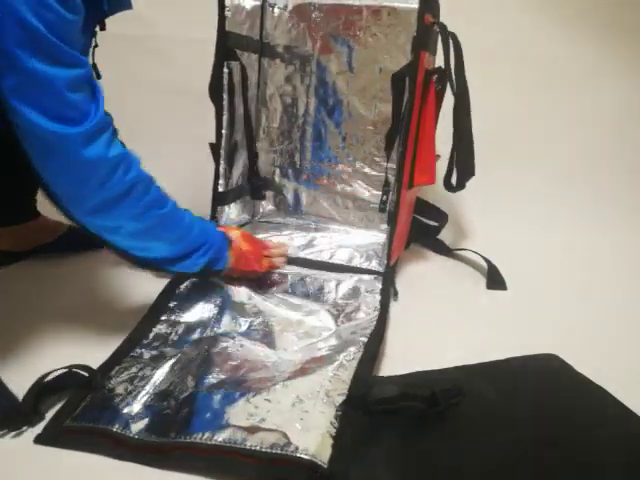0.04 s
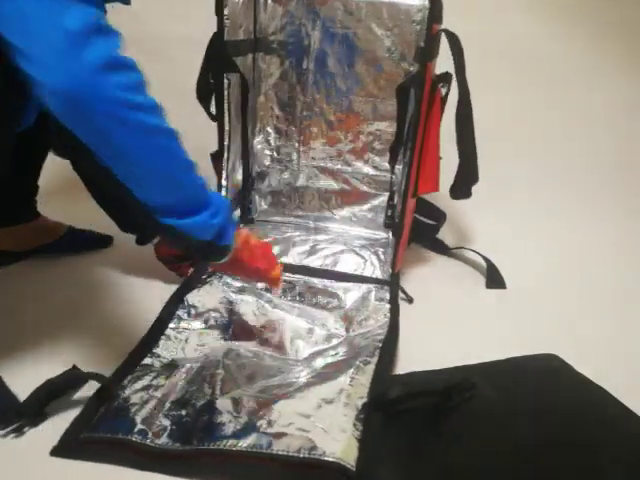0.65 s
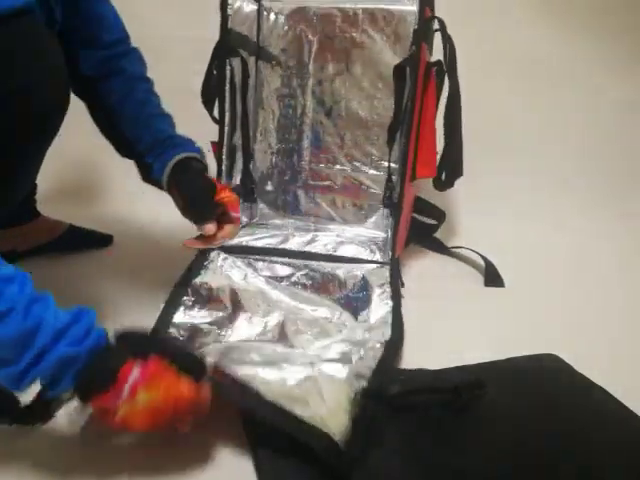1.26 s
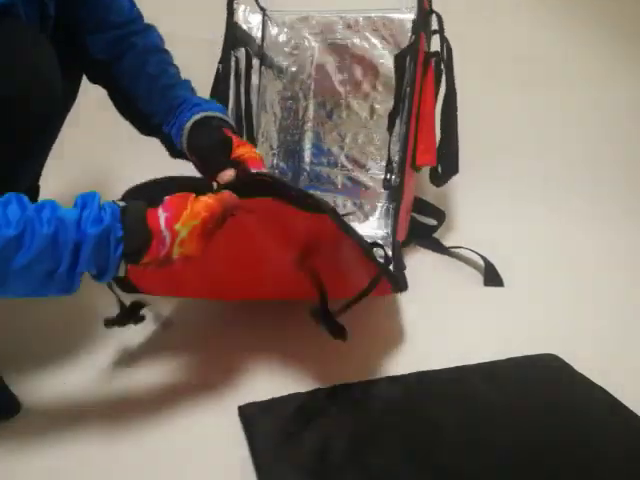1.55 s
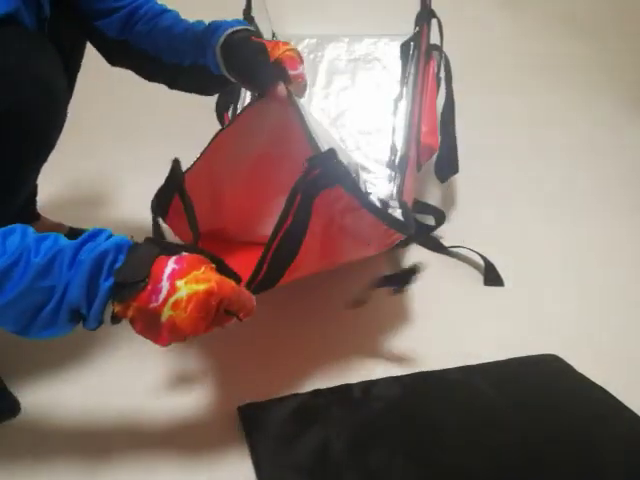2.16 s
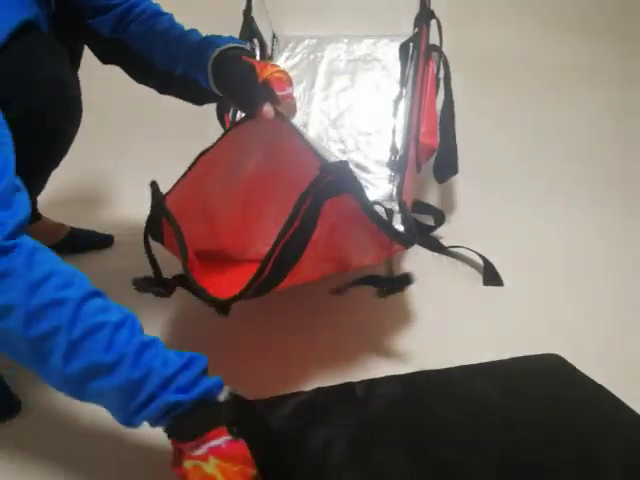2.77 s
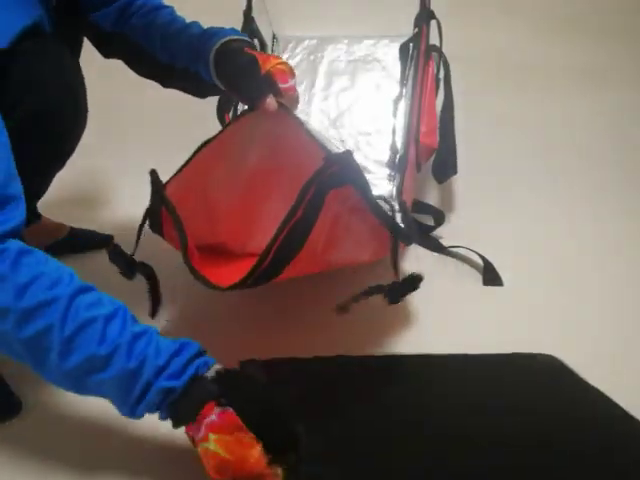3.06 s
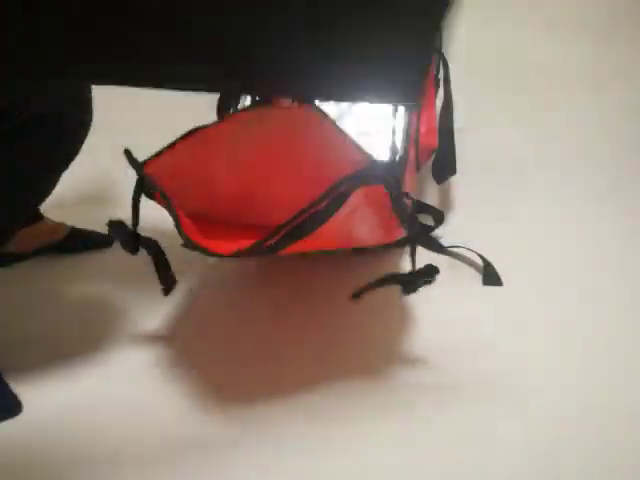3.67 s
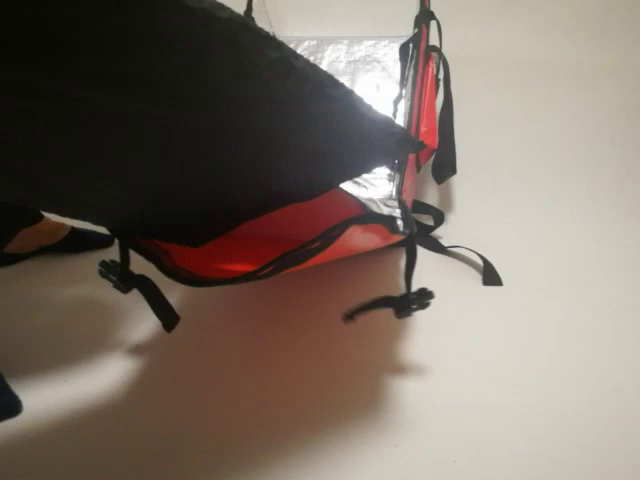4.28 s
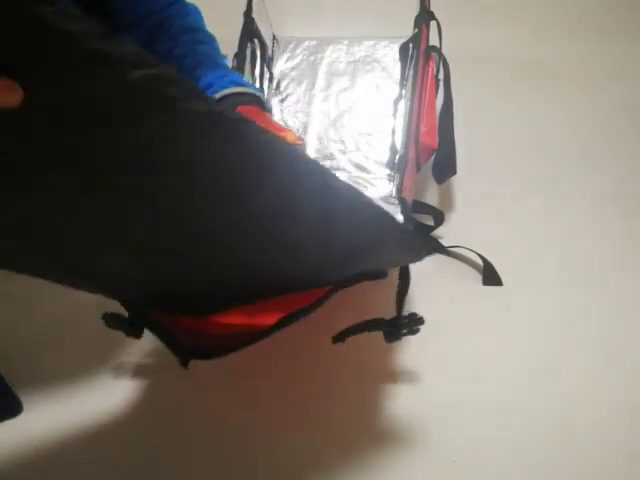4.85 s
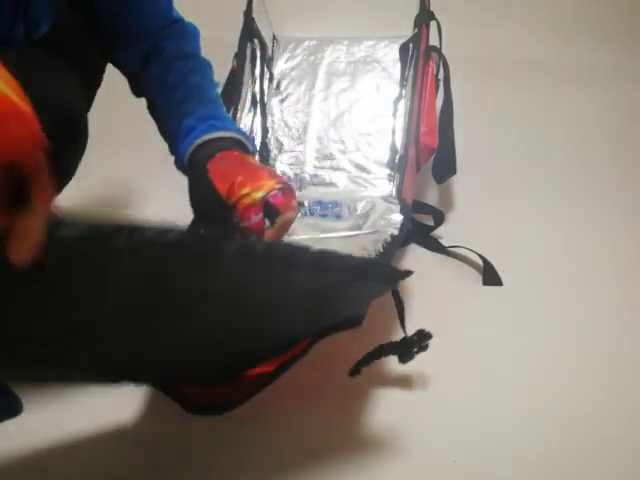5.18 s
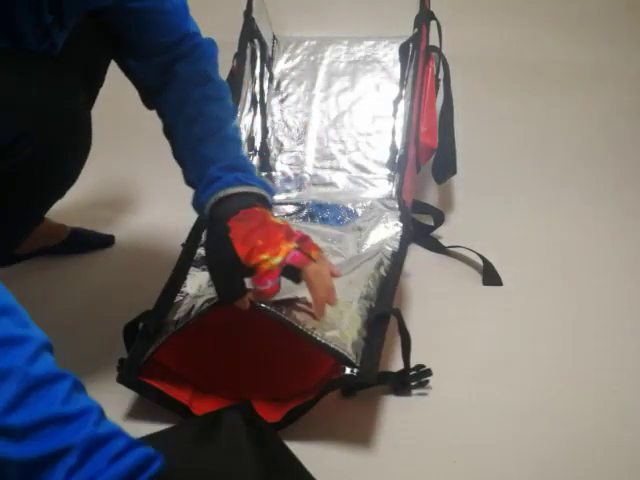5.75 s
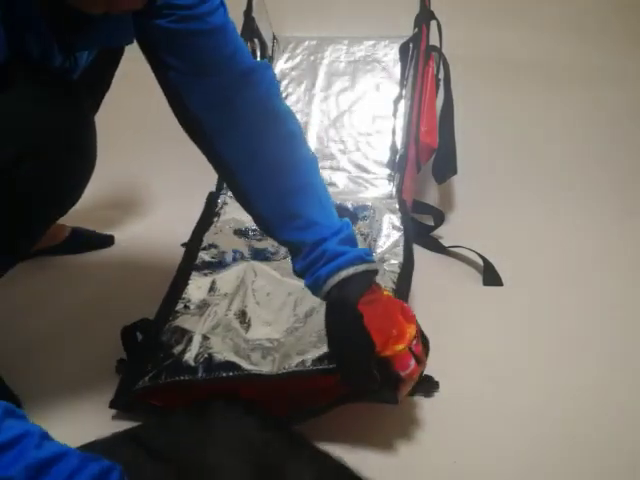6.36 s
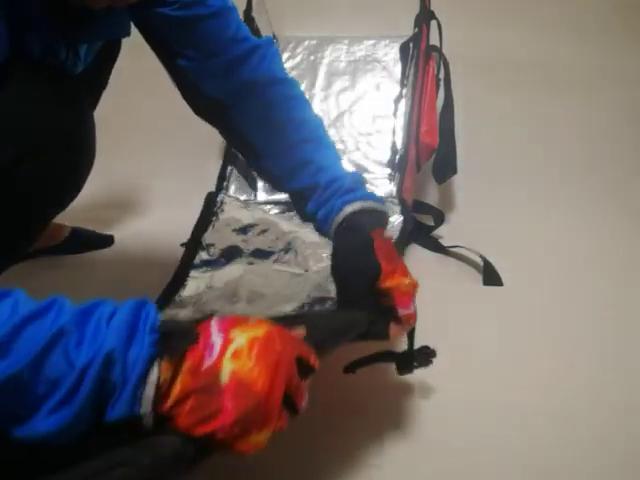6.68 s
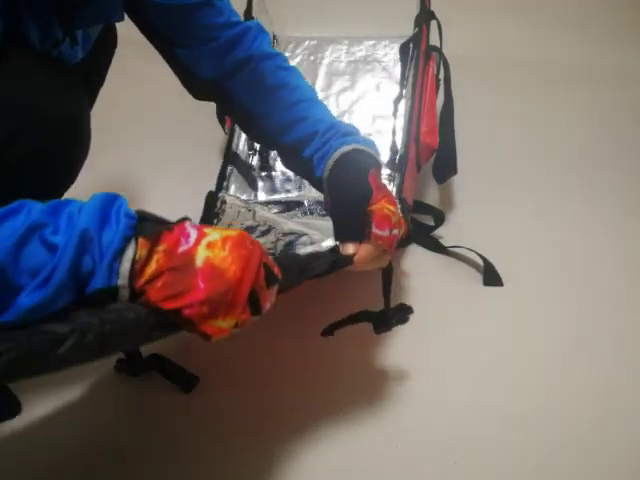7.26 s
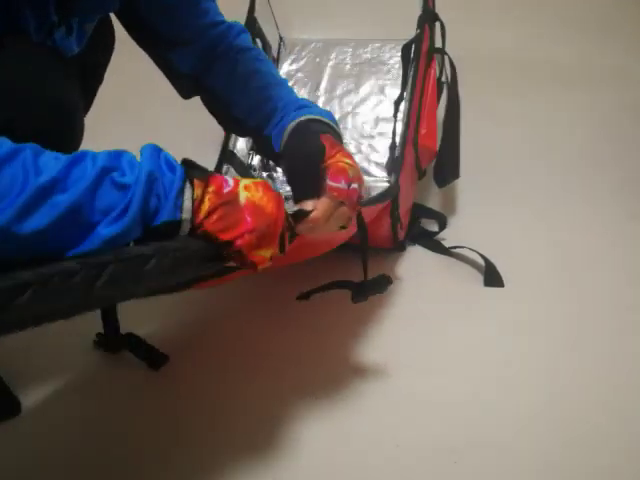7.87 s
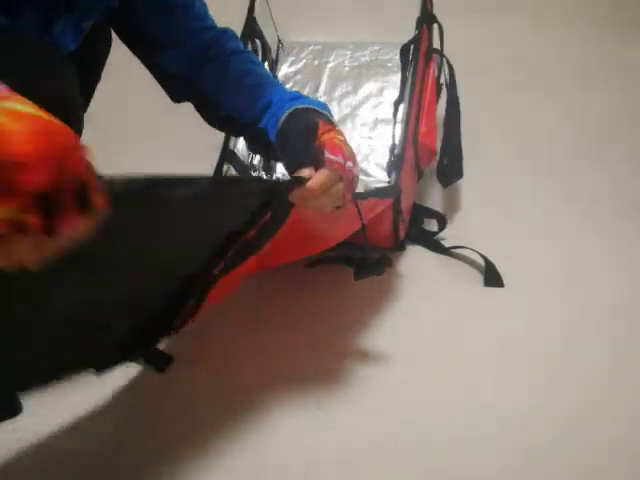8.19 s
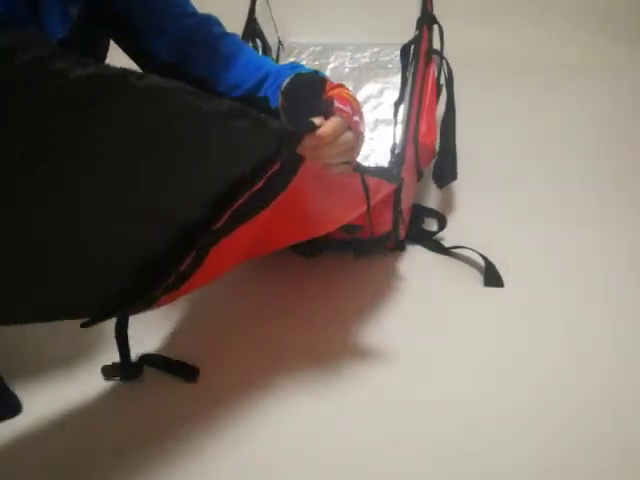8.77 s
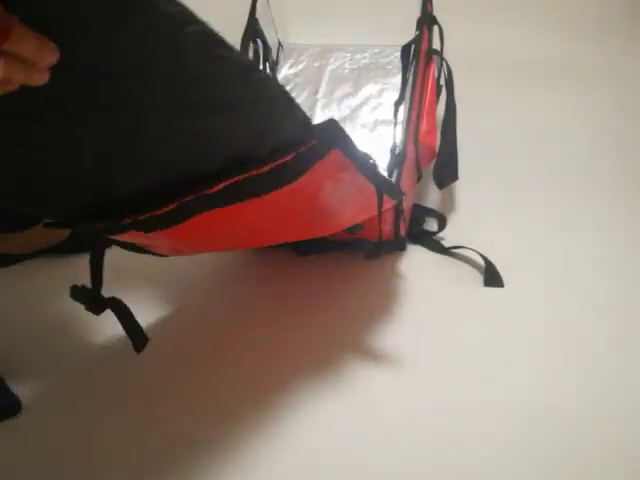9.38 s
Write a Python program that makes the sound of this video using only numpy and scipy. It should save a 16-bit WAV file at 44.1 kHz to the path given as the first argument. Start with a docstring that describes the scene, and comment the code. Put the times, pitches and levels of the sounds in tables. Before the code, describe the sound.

Foil lining crinkles in uneven bursts with sharp little pops as someone opens out a padded bag. The handling softens to light rustles, then a panel rubs against the coated cloth and thumps down about halfway through. Busier crinkling and sliding continue almost to the end, where a strap buckle ticks faintly. The sound is close and slightly to the left, with a hollow ring from the bag and short reflections from a small room.

```python
"""A stiff, foil-lined delivery bag is unfolded on the floor of a small bare room, close to a phone.
First the bending foil crackles and single creases snap through, most loudly near 1.8 s. After a lull
of light swishes, coated cloth sliding over itself, the padded panels flex and scrape, then thump down
near 5.3 s. Dense crackling and swishing follow until 9 s, and a strap buckle clinks faintly at the end.
Throughout, the hollow bag resonates and the walls reflect the sound."""
import sys
import numpy as np
from scipy import signal
from scipy.fft import rfft, irfft, next_fast_len
from scipy.io import wavfile
from scipy.ndimage import map_coordinates

SR = 44100
rng = np.random.default_rng(int(sys.argv[2]) if len(sys.argv) > 2 else 0)


def transcribe(u):
    """Save the signal u as a 16-bit wav file named by the first command-line argument.

    u: samples, shape (n,) or (channels, n), limited to [-1, 1]; the rate is SR.
    q: integer samples, one column per channel.
    """
    v = np.clip(np.atleast_2d(u).T, -1, 1)
    q = np.round(v * 32767).astype(np.int16)
    wavfile.write(sys.argv[1], SR, q)


N = 415853
TOP_HZ = 14400  # upper band limit


def amp(db):
    """Amplitude ratio of a level in decibels."""
    return 10 ** (np.asarray(db) / 20)


def along(points, hz):
    """Interpolation of (frequency, value) points on a logarithmic frequency axis."""
    knots_hz, values = np.transpose(points)
    return np.interp(np.log(hz + 1), np.log(knots_hz + 1), values)


def add(track, s, sound):
    """Superposition: a sound joins the track at time s."""
    part = track[..., max(0, round(s * SR)):][..., :sound.shape[-1]]
    part += sound[..., :part.shape[-1]]


def wobble(rate):
    """Random modulation: straight lines between Gaussian knots, rate knots a second."""
    knots = rng.standard_normal(int(N * rate / SR) + 4)
    return map_coordinates(knots, [np.arange(N) * rate / SR], order=1)


def unit(x):
    """Normalisation to rms 1."""
    return x / np.sqrt(np.mean(x ** 2) + 1e-20)


def filtered(x, response):
    """Linear filtering: the spectrum of x times a frequency response."""
    size = next_fast_len(N + 8192, True)
    return irfft(rfft(x, size) * response(np.fft.rfftfreq(size, 1 / SR)), size)[..., :N]


def coloured(x, spectrum):
    """Spectral shaping by (frequency [Hz], level [dB]) points, at rms 1."""
    return unit(filtered(x, lambda hz: amp(along(spectrum, hz))))


def resonance(hz, centre, width):
    """Frequency response of a damped harmonic oscillator."""
    return 1j * hz * width / (centre ** 2 - hz ** 2 + 1j * hz * width)


def causal(gain):
    """The minimum-phase response with this gain, from the folded cepstrum."""
    cepstrum = irfft(np.log(np.maximum(gain, 1e-6)))
    half = len(cepstrum) // 2
    return np.exp(rfft(np.r_[cepstrum[0], 2 * cepstrum[1:half], np.zeros(half)]))


def diffuse(pair, hz):
    """Diffuse-field coherence: two independent spectra become left and right, alike only in the bass."""
    # likeness of the two microphone ports: (frequency [Hz], correlation [ratio])
    coherence = [(150, 0.92), (300, 0.88), (600, 0.68), (1200, 0.19), (3000, 0.021), (8000, 0.015)]
    angle = np.arccos(np.clip(along(coherence, hz), -1, 1)) / 2
    mid, side = pair[0] * np.cos(angle), pair[1] * np.sin(angle)
    return np.array([mid + side, mid - side])


def wide_noise():
    """An extended source: white noise, partly coherent at the two ports."""
    size = next_fast_len(N, True)
    spectra = rfft(rng.standard_normal((2, size)))
    return irfft(diffuse(spectra, np.fft.rfftfreq(size, 1 / SR)), size)[:, :N]


def grains(count, cycles, spread_db, size=256):
    """Shot noise: tiny damped oscillations of random time, pitch and strength, white on average."""
    when, where, strength = rng.random((count, 3)).T
    hz = (np.sqrt(400) + where * (np.sqrt(TOP_HZ) - np.sqrt(400))) ** 2
    gain = amp(-spread_db * np.log(strength + .015)) * hz ** .75
    turns = hz[:, None] * np.arange(size) / SR
    rings = gain[:, None] * np.sin(2 * np.pi * turns) * np.exp(-turns / cycles)
    places = (when * N).astype(int)[:, None] + np.arange(size)
    return unit(np.bincount(places.ravel(), rings.ravel(), N)[:N])


def blow(gain, length_s, push, rise_s=1 / SR):
    """Source and filter: an impulse and a burst of small slips excite a response; energy 1 per port."""
    t = np.arange(2 * len(gain) - 2) / SR
    slips = rng.standard_normal((2, len(t))) * np.minimum(t / rise_s, 1) * np.exp(-(t / length_s) ** 2)
    slip_spectra = rfft(slips) / np.linalg.norm(slips[0])
    force = push + diffuse(slip_spectra, np.fft.rfftfreq(len(t), 1 / SR))
    ring = irfft(force * causal(gain))
    return ring / np.linalg.norm(ring, axis=1, keepdims=True)


def hush():
    """Ambient noise of the still room: low rumble and faint hiss."""
    # noise floor: (frequency [Hz], relative spectral level [dB])
    spectrum = [(12, -32), (24, 9.5), (31, -14), (50, -11), (75, -12.5), (200, -15), (500, -41),
                (1200, -25), (2000, -25), (6500, -27), (13800, -32)]
    return amp(-61) * coloured(wide_noise(), spectrum)


def room_tail(early_t60_s=.05, delay_s=.003):
    """Reverberation: strong early reflections from floor and near walls, then exponential decay."""
    # decay of the room: (frequency [Hz], reverberation time T60 [s])
    t60 = [(120, 0.24), (400, 0.31), (1200, 0.22), (4000, 0.29), (8000, 0.24), (14000, 0.078)]
    hz, t, noise = signal.stft(rng.standard_normal((2, SR // 2)), SR, nperseg=256)
    t = t[:, None]
    decay = amp(-60 * t / along(t60, hz)) + amp(-60 * t / early_t60_s)
    spectra = diffuse(noise.transpose(0, 2, 1) * decay, hz).transpose(0, 2, 1)
    tail = signal.istft(spectra, SR, nperseg=256)[1]
    tail = np.pad(tail, ((0, 0), (round(delay_s * SR), 0)))
    return tail / np.linalg.norm(tail[0])


def room(x, segments=24):
    """Time-varying convolution: the reflections change as the bag and the arms move."""
    reflected, step = np.zeros((2, N)), N // segments + 1
    for start in range(0, N, step):
        add(reflected, start / SR, signal.fftconvolve(x[None, start:start + step], room_tail(), axes=1))
    return reflected


def hollow(x):
    """Sympathetic resonance: the open bag rings faintly with every sound made in it."""
    # modes of the cavity and its stiff walls: (frequency [Hz], bandwidth [Hz], level re the input [dB])
    modes = [(245.6, 16, -7), (423, 4.8, -1.5), (469, 9.8, -7.5), (745, 17, -3.5), (851, 12, -11),
             (1007, 22, -10), (1385, 30, -5.5), (2160, 37, -15), (2910, 30, -13)]
    ringing = lambda hz: sum(amp(db) * resonance(hz, centre, width) for centre, width, db in modes)
    return amp(-1.29) * filtered(x, lambda hz: 1 + ringing(hz))


def buckles(size=4096):
    """Hard impact: a plastic strap buckle clicks and rings for a moment in one mode."""
    # buckle contacts: (time [s], relative level [dB], pitch [Hz])
    clinks = [(0.637, -51, 6000), (0.8802, -54, 5650), (9.35, -56, 2980)]
    track, hz = np.zeros((2, N)), np.fft.rfftfreq(size, 1 / SR)
    click = amp(-26) * abs(resonance(hz, 4000, 4600))
    for s, db, pitch_hz in clinks:
        mode = abs(resonance(hz, pitch_hz, 340))
        add(track, s, amp(db + 30) * blow(mode + click, length_s=.0058, push=.85))
    return track


def bumps(size=16384):
    """Cushioned impact: a soft contact excites only the lowest modes of the bag's body, with no click."""
    # soft, hollow bumps: (time [s], relative level [dB])
    contacts = [(2.515, -41), (8.443, -42.5)]
    # modes of the body: (frequency [Hz], bandwidth [Hz], relative level [dB])
    modes = [(305, 21, -2), (392, 20, 1), (636, 60, -22)]
    track, hz = np.zeros((2, N)), np.fft.rfftfreq(size, 1 / SR)
    body = sum(amp(db) * abs(resonance(hz, centre, width)) for centre, width, db in modes)
    cushion = abs(resonance(hz, 310, 200))
    for s, db in contacts:
        add(track, s, amp(db + 19.5) * blow(body * cushion, length_s=.01, push=10))
    return track


def thumps(size=8192):
    """Modal excitation: a panel rings most near the struck spot's pitch; its weight thuds on the floor."""
    # panels knocking and landing: (time [s], relative level [dB], pitch [Hz], floor thud weighting [dB])
    landings = [(1.755, -28, 564, -20), (1.765, -22.5, 233, -21), (1.796, -37, 230, 0.5),
                (1.924, -34.5, 204, -12), (2.205, -35.5, 690, -34), (2.775, -46, 230, -13),
                (3.171, -31, 482.4, -26), (3.211, -40, 435, -15), (3.707, -31, 700, -27),
                (3.823, -29, 554, -10.5), (4.764, -35.5, 190, -7), (5.254, -12, 220, -15),
                (5.402, -16, 360, -29), (6.612, -21, 570, -18), (6.724, -27.5, 503, -34.5),
                (7.54, -27, 468, -30), (8.98, -29, 135, -20)]
    # damped modes of a padded panel: (frequency [Hz], bandwidth [Hz], relative level [dB])
    modes = [(117.4, 46, 4.5), (194, 45, 4.5), (280.6, 69, 5.5), (443, 195, 5), (577, 80, 6), (760, 41, -7),
             (1050, 110, 5)]
    track, hz = np.zeros((2, N)), np.fft.rfftfreq(size, 1 / SR)
    panel = sum(amp(db) * abs(resonance(hz, centre, width)) ** 2 for centre, width, db in modes)
    thud = abs(resonance(hz, 117, 54)) ** 2
    for s, db, pitch_hz, weight_db in landings:
        spot = abs(resonance(hz, pitch_hz, .55 * pitch_hz))
        add(track, s, amp(db + 15.5) * blow(panel * spot, length_s=.021, push=3.8))
        add(track, s, amp(db + weight_db + 23.5) * blow(thud, length_s=.0045, push=1.4))
    return track


def handling():
    """Incoherent strokes add in power: levels in dB of foil bending, cloth sliding and panel flexing."""
    # pulls, folds and pushes of the hands, each swelling, holding and settling:
    # (time [s], rise [s], hold [s], foil level [dB], cloth level [dB], panel level [dB])
    strokes = [(0.0, 0.00066, 0.014, -35.5, -41, -44.5), (0.086, 0.045, 0.064, -36.5, -40, -45),
               (0.219, 0.015, 0.046, -44.5, -46, -50), (0.295, 0.056, 0.14, -51.5, -53, -56.5),
               (0.643, 0.023, 0.011, -55, -80.5, -61), (0.869, 0.014, 0.061, -57, -79, -55),
               (1.104, 0.052, 0.072, -43, -49, -49), (1.248, 0.0099, 0.086, -50.5, -54.5, -55.5),
               (1.379, 0.02, 0.17, -50, -54, -55), (1.603, 0.035, 0.036, -41, -38.5, -58),
               (1.652, 0.016, 0.04, -33, -43, -43), (1.718, 0.032, 0.03, -23.5, -28, -34),
               (2.18, 0.018, 0.11, -56.5, -78, -45), (2.287, 0.03, 0.0078, -48.5, -49.5, -53),
               (2.676, 0.089, 0.022, -54, -51.5, -57.5), (2.852, 0.055, 0.0071, -57, -58, -64),
               (3.022, 0.018, 0.011, -51.5, -43.5, -54), (3.149, 0.027, 0.068, -48.5, -46, -49.5),
               (3.27, 0.022, 0.032, -49.5, -50.5, -52.5), (3.337, 0.027, 0.14, -52.5, -60.5, -53),
               (3.586, 0.0046, 0.045, -57.5, -55, -59), (3.677, 0.028, 0.025, -37.5, -39, -38.5),
               (3.765, 0.0081, 0.025, -44, -49, -42), (4.052, 0.023, 0.059, -50, -49, -53),
               (4.122, 0.033, 0.024, -53, -47, -67), (4.236, 0.014, 0.012, -58, -52, -55),
               (4.33, 0.023, 0.018, -72, -57, -52), (4.428, 0.057, 0.045, -41, -47.5, -44),
               (4.492, 0.069, 0.067, -34.5, -38.5, -39.5), (4.742, 0.024, 0.17, -46.5, -45, -55),
               (4.87, 0.015, 0.046, -47, -50, -47), (4.94, 0.064, 0.16, -46, -42, -53.5),
               (5.156, 0.068, 0.044, -34, -31.5, -48), (5.318, 0.025, 0.047, -64.5, -50, -47.5),
               (5.4, 0.0042, 0.004, -31.5, -38, -30.5), (5.569, 0.11, 0.03, -54.5, -65.5, -82.5),
               (5.718, 0.019, 0.072, -42.5, -45.5, -45), (5.873, 0.0066, 0.023, -42.5, -47, -62.5),
               (5.96, 0.032, 0.038, -46, -43.5, -54.5), (6.182, 0.01, 0.022, -43, -58, -48.5),
               (6.253, 0.057, 0.03, -44, -43, -50), (6.372, 0.022, 0.043, -58, -50.5, -74.5),
               (6.47, 0.15, 0.16, -51, -44, -73), (6.578, 0.12, 0.049, -39.5, -57, -47.5),
               (6.783, 0.0073, 0.033, -37, -43, -42.5), (7.036, 0.014, .01, -87, -59.5, -77),
               (7.124, 0.027, 0.13, -61.5, -60, -63.5), (7.23, 0.11, 0.062, -45.5, -48.5, -45),
               (7.417, 0.013, 0.14, -37.5, -42.5, -40), (7.671, 0.055, 0.028, -33.5, -32, -43.5),
               (7.8, 0.062, 0.21, -42, -48.5, -45.5), (7.924, 0.021, 0.25, -46.5, -42.5, -49),
               (8.017, 0.029, 0.0064, -35, -31, -47), (8.204, 0.037, 0.12, -49.5, -46, -76),
               (8.412, 0.018, 0.049, -61, -56.5, -55), (8.508, 0.11, 0.064, -56.5, -43.5, -79),
               (8.706, 0.011, 0.052, -38, -45, -56), (8.785, 0.051, 0.16, -37, -37.5, -49.5),
               (9.047, 0.02, 0.053, -47, -73.5, -52.5)]
    settle_db_per_s = np.array([[186], [200], [165]])  # foil, cloth, panel
    rest_db = [[-67], [-72.5], [-65.5]]  # the held bag is never quite still
    power = np.ones(N) * amp(rest_db) ** 2
    age = np.arange(SR) / SR
    for s, rise_s, hold_s, foil_db, cloth_db, flex_db in strokes:
        swell = np.minimum(age / rise_s, 1)
        release = amp(-settle_db_per_s * np.maximum(age - rise_s - hold_s, 0))
        add(power, s, (amp([[foil_db], [cloth_db], [flex_db]]) * swell * release) ** 2)
    return 10 * np.log10(power)


def flexing(flex_db):
    """Flexural vibration: the padded panels rumble hollowly as they bend."""
    # panel rumble: (frequency [Hz], relative spectral level [dB])
    spectrum = [(35, -12), (70, -10), (120, 0.5), (165, -3), (240, 0), (430, 2), (600, 1.5), (1000, 0.5),
                (3000, -73)]
    return amp(flex_db - 1) * unit(coloured(wide_noise(), spectrum) * amp(3.36 * wobble(60)))


def rubs(rows, rough_db, width_octaves=.56, bands=9, catches_per_s=150):
    """Friction noise: each rub swells and fades, its band centre following the changing speed."""
    track, hz = np.zeros((2, N)), np.fft.rfftfreq(SR // 2, 1 / SR)
    for s, length_s, db, start_hz, end_hz in rows:
        n = round(length_s * SR)
        progress, rub = np.linspace(0, 1, n), np.zeros((2, n))
        noise = diffuse(rfft(rng.standard_normal((2, SR // 2))), hz)
        for k, centre in enumerate(np.geomspace(start_hz, end_hz, bands)):
            band = np.exp(-.5 * (np.log2((hz + 1) / centre) / width_octaves) ** 2) * (hz < TOP_HZ)
            crossfade = np.maximum(1 - abs(progress * (bands - 1) - k), 0)
            rub += unit(irfft(noise * band))[:, :n] * crossfade
        catches = np.interp(np.arange(n), np.arange(128) * SR / catches_per_s, rng.standard_normal(128))
        arch = np.sqrt(2) * abs(np.sin(np.pi * progress)) ** .59
        add(track, s, amp(db) * unit(rub * amp(rough_db * catches)) * arch)
    return track


def scrapes():
    """Sliding friction: a padded panel's edge rasps in the midrange; the first drag, near 0.9 s, is the strap
    buckle rattling briefly as it settles."""
    # drags: (time [s], length [s], level [dB], starting centre [Hz], final centre [Hz])
    drags = [(0.885, 0.079, -59, 850, 1000), (2.2, 0.14, -56.5, 720, 900), (4.535, 0.15, -39, 850, 640),
             (4.86, 0.063, -39, 2300, 2100), (5.03, 0.064, -48, 800, 700), (5.165, 0.077, -42.5, 616, 530),
             (8.71, 0.043, -45.5, 406, 430)]
    return rubs(drags, rough_db=1.5)


def swishes():
    """Sliding friction of fabric on the lining: a high, gliding hiss."""
    # glides: (time [s], length [s], level [dB], starting centre [Hz], final centre [Hz])
    glides = [(0.12, 0.1, -41.5, 4800, 4200), (2.72, .11, -54.5, 3000, 4060),
              (2.87, .09, -54.5, 3660, 3020), (4.05, 0.096, -48, 10100, 11500),
              (4.13, 0.085, -48.5, 5750, 3800), (4.41, 0.33, -48.5, 8990, 12300),
              (4.738, 0.17, -44, 11500, 9500), (4.95, .25, -51, 8900, 6400),
              (5.165, 0.14, -46, 6440, 10900), (6.48, 0.2, -55.5, 4870, 8350),
              (8.25, 0.16, -54.5, 7500, 4510), (8.515, .2, -46.5, 8200, 11020),
              (8.8, 0.071, -44, 5370, 8470)]
    return rubs(glides, rough_db=3)


def cloth(slide_db, bend_db):
    """Stick-slip friction: coated cloth hisses and catches, airy in a light glide, fuller when gripped."""
    # cloth hiss: (frequency [Hz], relative spectral level [dB])
    spectrum = [(300, -6), (900, -14), (2500, 6.5), (4500, 5), (7500, 1.5), (10000, -2.5), (14000, -8)]
    hiss = coloured(wide_noise() + .13 * grains(count=6000, cycles=.88, spread_db=16), spectrum)
    dull = filtered(hiss, lambda hz: 1 / (1 + (hz / 6000) ** 4))
    top = filtered(hiss, lambda hz: 1 - 1 / (1 + (hz / 10000) ** 8))
    firmness_db = bend_db - slide_db
    grip = amp(np.interp(firmness_db, [-12, 4], [-6, 1]) + .3 * wobble(7.5))
    air = np.interp(firmness_db, [-8, 2], [.5, 0])
    roughness = amp(2.4 * wobble(150))
    return amp(slide_db + 2) * unit((hiss - dull + grip * dull + air * top) * roughness)


def fine_crackle(bend_db, full_bend_db=-40):
    """Sparse shot noise: the thin metal skin ticks brightly as it bends, no louder past a full bend."""
    # ticks: (frequency [Hz], relative spectral level [dB])
    spectrum = [(800, -22), (2500, 1), (5000, 4), (9000, -6.5), (14000, -18)]
    ticks = coloured(grains(count=1700, cycles=1.6, spread_db=7), spectrum)
    return amp(np.minimum(bend_db, full_bend_db) - 14) * ticks * amp([[0], [-6]])


def foil(bend_db):
    """Crackling noise: foil yields in clumps of tiny creases over a crinkle; a light touch mostly rubs."""
    # bending foil: (frequency [Hz], relative spectral level [dB])
    spectrum = [(150, -21), (400, -2), (700, -2.5), (1000, 1.5), (1500, 4), (2200, 0), (3000, -3.5),
                (4500, -5.5), (7000, -43), (10000, -28), (14000, -92)]
    creasing = np.interp(bend_db, [-55, -35], [.65, 1.15])
    creases = coloured(grains(count=7000, cycles=1.3, spread_db=4.8), spectrum) * amp([[0], [-4]])
    crinkle = coloured(wide_noise(), spectrum)
    crackle = (creasing * creases + crinkle) / np.hypot(creasing, 1)
    clumps = amp(2.1 * wobble(90))
    return amp(bend_db - 2) * unit(crackle * clumps)


def lesser_creases(bend_db, slide_db, candidates=230):
    """Yield threshold: random creases give way where bending is strong and exceeds sliding; snap rows."""
    yield_db, moderate_db, full_db, ring_db = -56.5, -43.5, -38, -8
    places = rng.integers(N, size=candidates)
    strength, octaves, treble = rng.standard_normal((candidates, 3)).T
    load_db = np.minimum(bend_db[places], full_db)
    db = -35 + .75 * (load_db - moderate_db) + 4 * strength  # a harder bend snaps louder
    pitch_hz = 1670 * 2 ** (.76 * octaves)
    treble_db = -20 + 5 * treble
    gives_way = (load_db > yield_db) & (bend_db[places] > slide_db[places] + 2)
    return [(*row, ring_db) for row in np.transpose([places / SR, db, pitch_hz, treble_db])[gives_way]]


def snaps(bend_db, slide_db, size=4096):
    """Snap-through buckling: a crease pops and rings two modes of its facet; (direct sound, room feed)."""
    # the loudest creases: (time [s], relative level [dB], pitch [Hz], treble [dB], ring [dB])
    loudest = [(0.009, -23.5, 5530, -13, -7), (0.0195, -22, 5460, -9.5, -4), (0.09, -25, 1980, -18, -14),
               (0.117, -29, 2810, -23, -4), (0.126, -20, 5070, -26.5, -4), (0.164, -25, 2950, -16, -1.5),
               (0.237, -25, 2020, -3, 3.5), (0.289, -29.5, 1960, -17, -6), (0.344, -28, 2410, -17, -20),
               (0.371, -29.5, 1900, -33, -14), (0.394, -31.5, 1750, -24, 12), (0.454, -32, 1090, -22, -22),
               (0.502, -38.5, 2430, -3, -2), (0.622, -38, 3400, -14, -4), (0.878, -34.5, 840, -33, 8),
               (1.12, -29.5, 2610, -3, 2), (1.128, -30.5, 2690, -14, -8), (1.1435, -22.5, 2630, 4.5, 10.5),
               (1.201, -26, 1450, -13, -1), (1.208, -25.5, 2800, -5, -6), (1.299, -33.5, 2200, -20, -5),
               (1.282, -30.5, 1410, -20, -13.5), (1.4, -29, 1720, -30.5, -9), (1.42, -32.5, 3610, 1, -1.5),
               (1.428, -47, 2650, 7, 2), (1.461, -31.5, 1850, -14, 2), (1.484, -25, 1690, -29.5, -11),
               (1.564, -30, 2010, -12, -6), (1.586, -13.5, 2520, -10, 2), (1.6925, -20, 1360, -22, -3),
               (1.612, -27, 1080, -10, 8), (1.63, -17, 1900, -1.5, 6), (1.756, -8.5, 2820, -15, 0),
               (1.769, -15, 1470, -1, 1), (1.923, -27, 2080, -10.5, -4), (2.03, -35.5, 850, -13, 11),
               (2.186, -30.5, 1590, -26, -9), (2.267, -32.5, 1700, -38, 4), (2.296, -26.5, 990, -19, -2),
               (3.042, -29.5, 2620, -1, -2), (3.288, -35, 1140, -30, 12), (3.578, -23, 1560, -7.5, 0),
               (3.707, -18.5, 2720, -12, -3), (3.712, -22.5, 1886, -22, -3),
               (3.741, -20.5, 1418, -43.5, 0.5), (3.782, -32, 1450, 4, -6), (3.823, -23.5, 1120, -13, 0.5),
               (3.885, -33, 990, -41, -7), (4.0, -36, 1570, -46, -9), (4.02, -28.5, 1180, -56, 2),
               (4.088, -25, 1240, -18, -2), (4.29, -37, 840, -31, -7), (4.36, -36, 1570, -25.5, 8),
               (4.42, -27, 1610, -25.5, -11), (4.443, -27, 1224, -5, 8), (4.513, -22, 1146, -13, -1),
               (4.938, -26, 1570, -26, 11), (4.52, -19.5, 1120, -28, 0), (4.559, -17.5, 1420, -20.5, -5),
               (4.865, -22, 1430, -13, -0.5), (5.404, -15, 974, -12, -1), (5.603, -42.5, 825, -27, -3),
               (5.684, -34, 2730, -29, -13), (5.734, -25, 1000, -2, 6), (5.773, -24, 1477, -22, -11),
               (5.811, -25.5, 2085, -12, -4), (5.889, -25, 2010, 0, 13), (5.907, -24, 1475, -9, 0),
               (5.988, -31.5, 940, -15, -3), (6.174, -29, 1060, -16, 2.5), (6.222, -35.5, 1510, -34, -6),
               (6.257, -22.5, 3330, -15.5, -9), (6.318, -21.5, 1110, -32, -4), (6.655, -20, 1450, -26, -6),
               (6.694, -20.5, 1380, -15.5, -4), (6.723, -18.5, 3800, -4, -5),
               (6.791, -21.5, 1410, -22, -19), (6.872, -18, 2220, -9, 1), (7.17, -37, 12300, -9, 19),
               (7.257, -28, 1703, -35, -17), (7.321, -24.5, 9700, 2, 0.5), (7.366, -27, 1670, -28, 1),
               (7.377, -25, 2920, -24, -4), (7.437, -20, 1950, -29, 3), (7.462, -18.5, 3400, -23, -10),
               (7.513, -20, 1720, -26.5, 17), (7.54, -13.5, 988, 0.5, 20), (7.676, -27, 1406, -23.5, -13),
               (7.723, -19.5, 1400, 5, -3), (7.865, -31, 1235, -26.5, 3), (7.943, -16, 1920, -21, -16),
               (7.955, -24, 1430, -20, -2), (7.972, -22, 1400, -10, -1), (8.039, -16, 1730, 7, 9),
               (8.048, -19.5, 2380, -30, -13.5), (8.095, -24.5, 5900, -12, 3), (8.1795, -17, 1540, -4, 4),
               (8.186, -21, 1140, -25, -4), (8.708, -30, 1630, 0, -6), (8.718, -14.5, 1730, -9, 5.5),
               (8.855, -22, 1660, -11, -6), (8.91, -28, 1380, -24, 4), (8.93, -24.5, 1000, -18, 8),
               (8.991, -18, 1660, -31, -6)]
    # crack of a crease: (frequency [Hz], relative spectral level [dB])
    spectrum = [(80, -27.5), (300, -6), (700, -1.5), (1300, 0), (3000, 2.5), (5000, -0.5), (8000, -7),
                (14000, -20)]
    # bright creases give way faster than dull ones: (treble [dB], rise [s])
    rises = [(-24, .0012), (-4, .00025)]
    # and are over sooner: (treble [dB], length [s])
    lengths = [(-24, .0022), (-4, .0014)]
    direct, to_room, hz = np.zeros((2, N)), np.zeros(N), np.fft.rfftfreq(size, 1 / SR)
    treble_shelf = along([(1800, 0), (7000, .9), (13000, 1)], hz)
    for s, db, pitch_hz, treble_db, ring_db in loudest + lesser_creases(bend_db, slide_db):
        first, second = [abs(resonance(hz, f, .31 * f)) ** 2 for f in (pitch_hz, 1.55 * pitch_hz)]
        facet = amp(ring_db + 13) * (first + amp(-18) * second)
        crack = amp(along(spectrum, hz) + (treble_db + 14) * treble_shelf)
        colour = np.hypot(crack, facet)
        push = np.interp(treble_db, [-24, -8], [.12, .3])
        rise_s, length_s = [np.interp(treble_db, *np.transpose(rule)) for rule in (rises, lengths)]
        add(direct, s, amp(db + 12) * blow(colour, length_s, push, rise_s))
        even = irfft(causal(colour))  # summed over all directions, the slips even out
        add(to_room, s, amp(db + 15) * even / np.linalg.norm(even))
    return direct, to_room


def scene():
    """Direct and reverberant fields add: the bag lies towards the left port, the room surrounds both."""
    bend_db, slide_db, flex_db = handling()
    rubbing = swishes() + scrapes()
    crackle = foil(bend_db) + fine_crackle(bend_db)
    rustle = crackle + cloth(slide_db, bend_db) + flexing(flex_db) + rubbing
    pops, pops_to_room = snaps(bend_db, slide_db)
    clinks, knocks = buckles(), thumps() + bumps()
    direct = rustle + (pops + clinks) * amp([[4], [-2]]) + knocks
    to_room = amp(-11.5) * rustle[0] + amp(-3.5) * (pops_to_room + clinks[0]) + amp(-1) * knocks[0]
    return hollow(direct + room(to_room)) + hush()


def record(dry):
    """Acoustic shadow and band limit: the right port is shaded, and the phone cuts the top treble."""
    # shadow at the right port: (frequency [Hz], level re the left [dB])
    shadow = [(60, -3), (450, -2.5), (1100, -4), (4000, -4.5), (8000, -5.5), (13000, -9)]
    ports = lambda hz: np.array([np.ones_like(hz), amp(along(shadow, hz))])
    low_pass = lambda hz: 1 / np.sqrt(1 + (hz / TOP_HZ) ** 160)
    return amp(2) * filtered(dry, lambda hz: ports(hz) * low_pass(hz))


dry = scene()
out = record(dry)
transcribe(out)
```